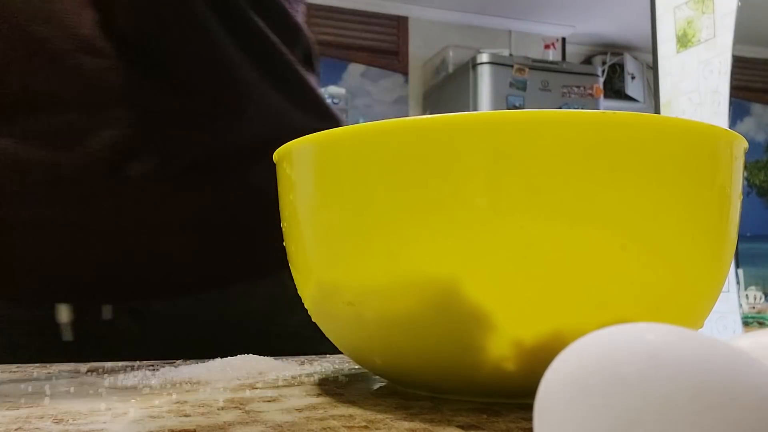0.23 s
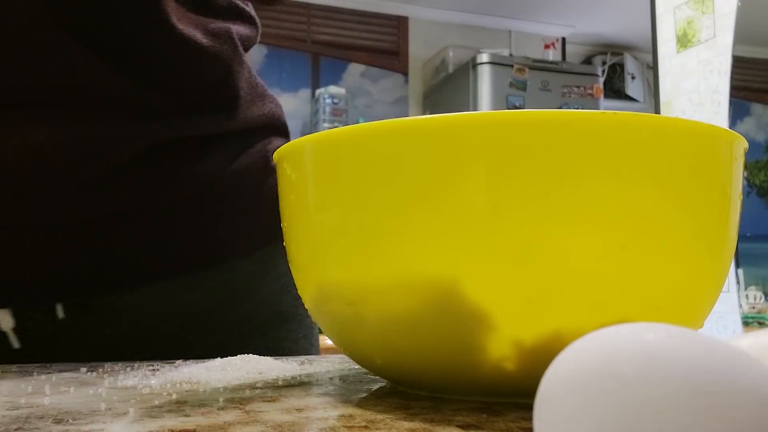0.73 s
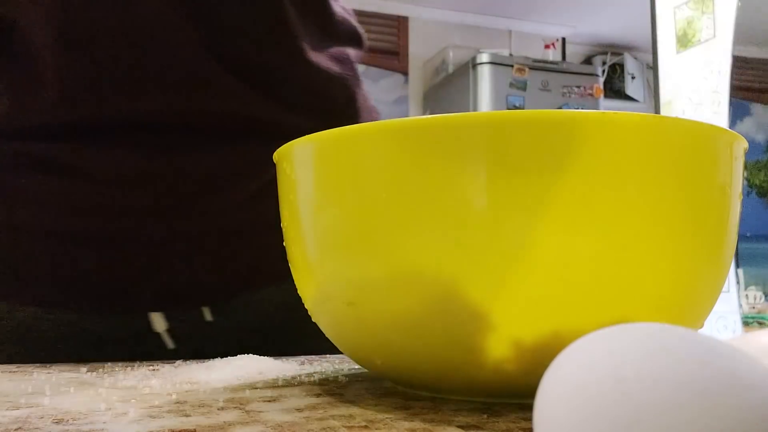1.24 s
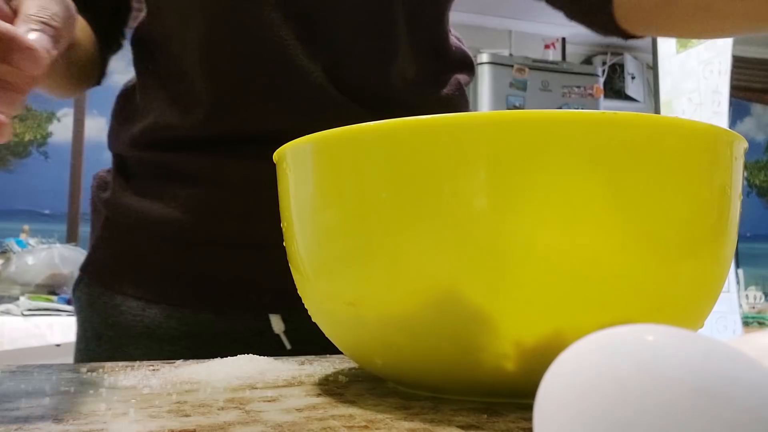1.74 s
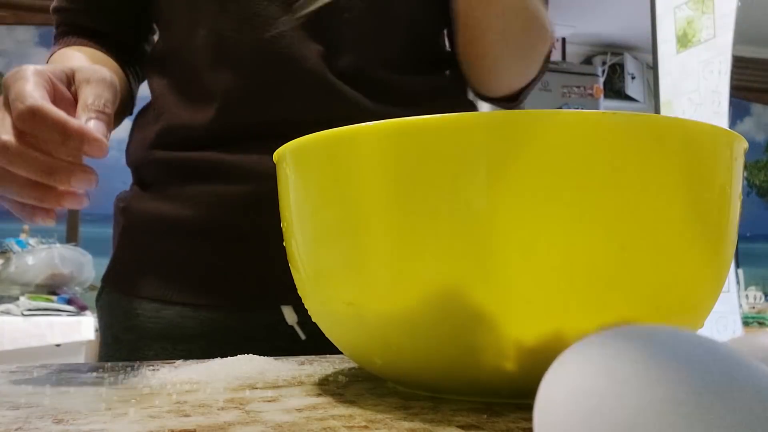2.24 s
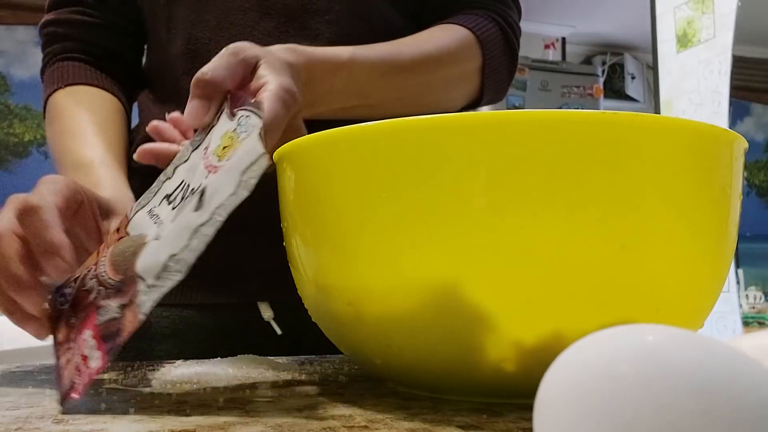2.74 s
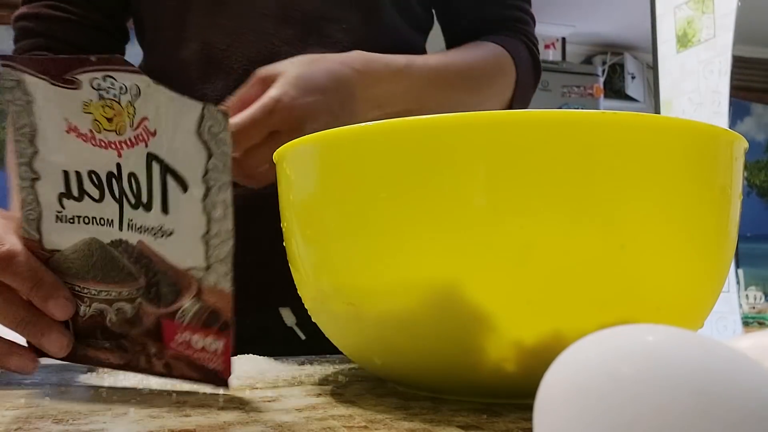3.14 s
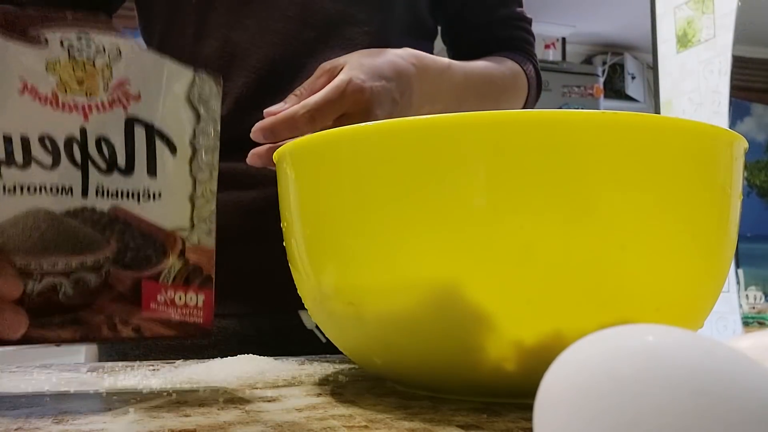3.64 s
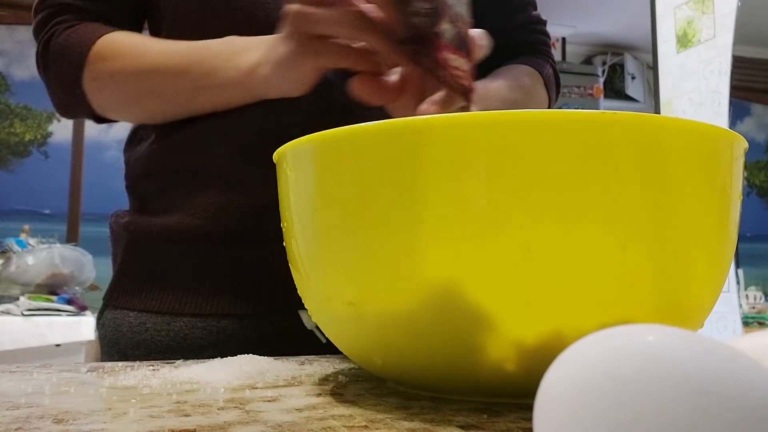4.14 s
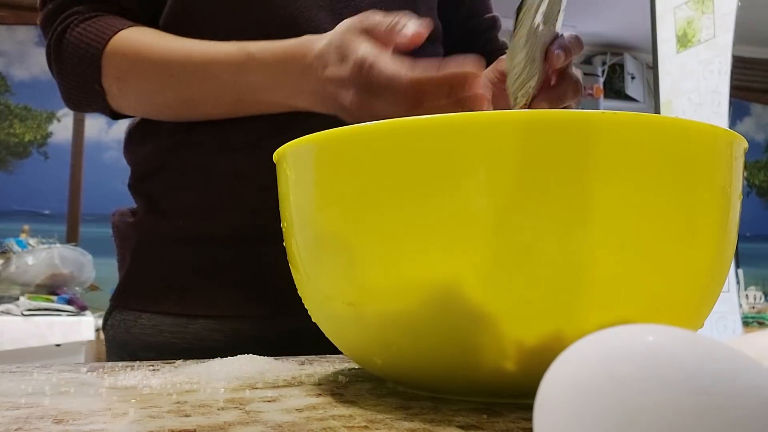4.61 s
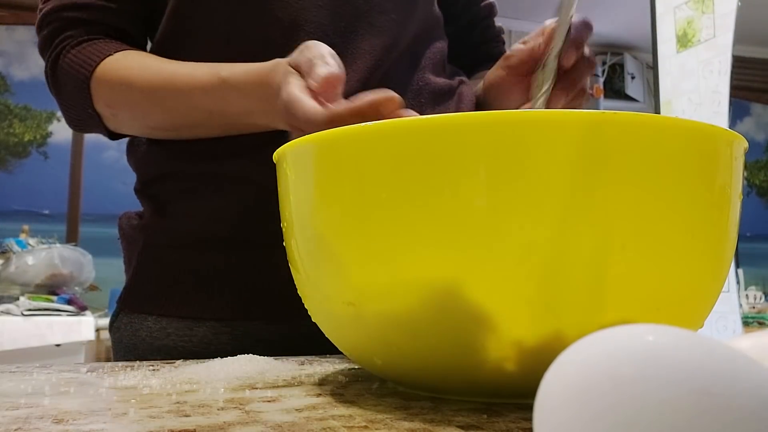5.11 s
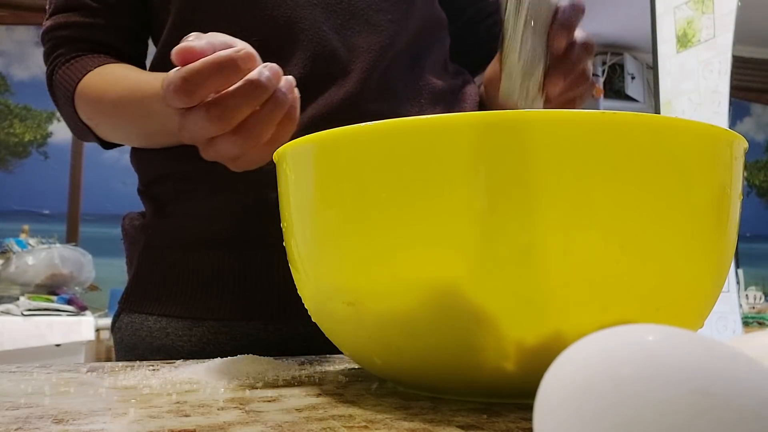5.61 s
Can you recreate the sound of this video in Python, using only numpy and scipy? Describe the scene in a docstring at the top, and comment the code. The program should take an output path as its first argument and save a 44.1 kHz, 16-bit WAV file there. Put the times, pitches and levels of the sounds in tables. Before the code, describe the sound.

Crisp foil and paper rustle close by as hands search a rattling wooden drawer, which then closes with a heavy thud. Lighter crinkles and small knocks follow as a spice sachet is picked up, with a couple of sharp snaps. It ends with a run of quiet, grainy shakes of the sachet. A fridge hums very faintly in the small kitchen.

```python
"""A fridge hums faintly in a small kitchen. Someone rummages in a drawer of packets: foil buckles, paper
scuffs, and the wood rumbles and knocks in its damped modes. Near 1.4 s the drawer is shoved shut with a
boom. A foil sachet is then handled, crinkling and snapping, and from about 3 s it is shaken over a bowl,
the spice sliding inside in short hisses. Near the end a finger slips on the foil with a faint squeak."""
import sys
import numpy as np
from scipy import signal
from scipy.fft import rfft, irfft, next_fast_len
from scipy.io import wavfile
from scipy.ndimage import uniform_filter1d, map_coordinates

SR = 44100
rng = np.random.default_rng(int(sys.argv[2]) if len(sys.argv) > 2 else 0)


def inscribe(sig):
    """Save sig as 16-bit PCM at rate SR to the path in sys.argv[1].

    A 1-D sig is mono; a 2-D sig holds one channel per row.
    Samples are clipped to [-1, 1] before scaling.
    """
    pcm = np.round(np.clip(np.atleast_2d(sig).T, -1, 1) * 32767)
    wavfile.write(sys.argv[1], SR, pcm.astype(np.int16))


N = 258426
TIME_S = np.arange(N) / SR


def amp(db):
    """Decibels as an amplitude ratio."""
    return 10 ** (np.asarray(db) / 20)

def unit_rms(x):
    """Normalisation to a mean power of 1."""
    return x / np.sqrt(np.mean(x ** 2) + 1e-20)

def in_time(rows):
    """Linear interpolation of (time_s, values...) rows, one curve per value."""
    times, *columns = np.transpose(rows)
    return [np.interp(TIME_S, times, column) for column in columns]

def at_hz(points, hz):
    """Interpolation on a logarithmic frequency axis."""
    freqs, values = np.transpose(points)
    return np.interp(np.log(hz), np.log(freqs), values)

def colour(x, spectrum):
    """Spectral shaping to unit rms; nothing passes outside the table's range."""
    size = next_fast_len(N)
    hz = np.fft.rfftfreq(size, 1 / SR) + 1
    inside = (hz > spectrum[0][0]) & (hz < spectrum[-1][0])
    return unit_rms(irfft(rfft(x, size) * amp(at_hz(spectrum, hz)) * inside, size)[:N])

def drift(rate_hz):
    """Low-passed noise: a slow random fluctuation of unit rms."""
    r = np.exp(-2 * np.pi * rate_hz / SR)
    return unit_rms(signal.lfilter([1], [1, -2 * r, r * r], rng.standard_normal(N + 9000))[9000:])

def ring(force, hz, t60_s):
    """Damped oscillator: a unit impulse starts a decaying sine of height 1."""
    r, w = amp(-60 / (t60_s * SR)), 2 * np.pi * hz / SR
    return signal.lfilter([0, np.sin(w)], [1, -2 * r * np.cos(w), r * r], force + 1e-18)

def grains(per_s, spread_db):
    """Poisson process: sparse impulses of random size and sign."""
    sizes = amp(spread_db * np.minimum(rng.exponential(1, N), 5)) * rng.choice([-1, 1], N)
    return sizes * (rng.random(N) < per_s / SR)

def steady(x, window_s):
    """Division by the running rms flattens slow swells and holds the rms near 1."""
    x = unit_rms(x)
    return x / np.sqrt(uniform_filter1d(x ** 2, size=int(window_s * SR)) + .05)

def wide_source(spectrum, per_s, spread_db, width=1.0):
    """Partial coherence of an extended source: rows of grains common to both sides, left, right."""
    common, side = [colour(grains(per_s, spread_db), spectrum) for _ in range(2)]
    return np.array([common, width * side, width * np.roll(side, N // 2)])


# Spectrum of room tone and microphone hiss: frequency_hz, density_db
AIR_SPECTRUM = [(35, -27.5), (60, -8.5), (71, -15), (179, -23), (293, -23.5), (405, -28), (445, -13.5),
                (524, -34), (960, -34.5), (1500, -36), (7290, -42.5), (12800, -25.5), (15700, -40.5)]

def room_tone():
    """Incoherent noise: each channel has a steady hiss of its own."""
    return amp(-61) * np.array([colour(rng.standard_normal(N), AIR_SPECTRUM) for _ in range(2)])

def fridge_hum(pitch_hz=48, level_db=-59):
    """Random amplitude and frequency modulation make a low tone waver, a little to the right."""
    gain = amp(level_db + drift(3))
    phase = 2 * np.pi * np.cumsum(pitch_hz + 0.4 * drift(12)) / SR
    return gain * np.sin(phase) * amp([[-1.5], [1.5]])


# Reverberation time of the kitchen: frequency_hz, t60_s
ROOM_DECAY = [(100, 0.38), (700, 0.25), (3000, 0.19), (12000, 0.17)]

def reverberation(x):
    """Diffuse field: reflections merge into noise of unit energy that decays octave by octave."""
    t, tail = np.arange(SR // 2) / SR, 0
    onset = np.clip(t / 0.00076 - .5, 0, 1)
    for low_hz in 40 * 2 ** np.arange(9.):
        band = signal.butter(2, [low_hz, min(2 * low_hz, .45 * SR)], "band", fs=SR, output="sos")
        decay = amp(-60 * t / at_hz(ROOM_DECAY, low_hz * np.sqrt(2)))
        tail = tail + signal.sosfilt(band, rng.standard_normal((2, len(t)))) * onset * decay
    tail = tail / np.sqrt(np.sum(tail ** 2, axis=1, keepdims=True))
    return signal.fftconvolve(x, tail, axes=1)[:, :N]


# Modes of the drawer and counter: frequency_hz, level_db, t60_s
WOOD_MODES = [(66, -8, .16), (113, 0, .14), (160, -3, .1), (250, -2, .09), (318, 0, .09), (385, -1, .1),
              (470, -5, .07), (620, -9, .05), (760, -9, .05), (900, -12, .05)]

def furniture():
    """Forced vibration: rolling and bumping drive the wood; three low modes boom, the rest rumble."""
    modes = [amp(db) * ring(grains(per_s=700, spread_db=4.5), hz, t60_s) * np.sqrt(.1 / t60_s)
             for hz, db, t60_s in WOOD_MODES]
    return steady(sum(modes[3:]), window_s=.03), steady(sum(modes[:3]), window_s=.05)


def finger_squeak(start_s=5.325, end_s=5.42, pitch_hz=2250, level_db=-59):
    """Friction of a finger slipping on foil: noise swells and fades through a narrow resonance."""
    slipping = (TIME_S > start_s) & (TIME_S < end_s)
    swell = np.sin(np.pi * (TIME_S - start_s) / (end_s - start_s)) ** 2 * slipping
    resonance = ring(rng.standard_normal(N), pitch_hz, t60_s=.012)
    return amp(level_db) * swell * unit_rms(ring(resonance, pitch_hz, t60_s=.012))


# Spectrum of sliding spice: frequency_hz, density_db
SPICE_SPECTRUM = [(1590, -27), (2700, -10), (4430, -1.5), (6400, -5), (11200, 3), (15700, -5)]
# Shakes of the sachet: peak_s, level_db, rise_s, fall_s
SACHET_SHAKES = [(3.062, -31.5, 0.0084, 0.011), (4.069, -47.5, 0.046, 0.021), (4.435, -44.5, 0.03, 0.022),
                 (4.69, -54.5, 0.051, 0.038), (5.019, -54, 0.064, 0.018), (5.335, -44.5, .006, 0.008),
                 (5.485, -41, 0.01, 0.0097), (5.641, -39.5, 0.017, 0.0065), (5.776, -41.5, 0.029, 0.017)]

def sliding_spice():
    """Granular noise: a hiss swells as the spice slides to one end and fades as it settles."""
    swell = sum(amp(db) * np.exp(-np.abs(TIME_S - peak_s) / np.where(TIME_S < peak_s, rise_s, fall_s))
                for peak_s, db, rise_s, fall_s in SACHET_SHAKES)
    return swell * wide_source(SPICE_SPECTRUM, per_s=17000, spread_db=2.0)


# Spectrum of scuffed paper: frequency_hz, density_db
SCUFF_SPECTRUM = [(380, -11.5), (650, -2.5), (748, -10), (1040, -6.5), (2270, -11.5), (2670, -17.5),
                  (3800, -16), (4940, -41.5), (8360, -120)]

def paper_scuff():
    """Friction noise: scuffed paper gives a stream of very uneven midrange impulses."""
    return wide_source(SCUFF_SPECTRUM, per_s=2500, spread_db=4.5)


# Spectrum of crinkling foil: frequency_hz, density_db
CRINKLE_SPECTRUM = [(1530, -23.5), (2600, -6.5), (3850, -3.5), (4180, -0.5), (4710, -2), (7300, -8),
                    (10600, -4), (12700, -3.5), (15700, -9.5)]

def foil_crinkle():
    """Buckling: each tiny fold that gives way radiates a bright click."""
    return wide_source(CRINKLE_SPECTRUM, per_s=4000, spread_db=2.5, width=1.53)


# Faint rustle between strokes: time_s, foil_db, drawer_db
RESTING_RUSTLE = [(0, -62.5, -57), (.12, -46.5, -35), (.55, -39, -45.5), (1.1, -60.5, -67),
                  (1.7, -81.5, -53.5), (2.15, -64, -69), (2.5, -80, -55.5), (2.85, -75, -57),
                  (3.25, -65.5, -68), (3.85, -90.5, -82), (4.0, -65.5, -65.5), (4.6, -63.5, -64),
                  (5.0, -70.5, -77.5), (5.86, -69, -80.5)]
# Strokes of the hands: full_s, swell_s, hold_s, foil_db, paper_db, drawer_db, counter_db
HAND_STROKES = [(0.041, 0.022, 0.049, -47.5, -54, -29, -35), (0.151, 0.066, 0.14, -35.5, -46.5, -24, -58),
                (0.276, 0.1, 0.094, -19.5, -25.5, -28.5, -41),
                (0.393, 0.038, 0.082, -31.5, -34.5, -29.5, -32),
                (0.596, 0.057, 0.058, -29, -32.5, -33.5, -38),
                (0.687, 0.037, 0.093, -32, -29.5, -27, -34.5),
                (.852, 0.0076, 0.0053, -40.5, -30.5, -38, -52), (0.9, 0.018, 0.012, -66, -41.5, -38.5, -55),
                (.955, .02, 0.027, -53, -38, -29, -46.5), (1.36, 0.054, 0.026, -9.5, -11.5, -9, -10),
                (1.397, 0.041, 0.047, -25.5, -25.5, -8.5, -13.5),
                (1.497, 0.093, 0.021, -37.5, -35.5, -26, -22),
                (1.771, 0.011, 0.019, -67.5, -61.5, -40, -49),
                (1.851, 0.049, 0.097, -44.5, -41, -34, -36.5),
                (1.983, 0.037, 0.056, -54, -55, -41.5, -58.5), (2.862, 0.021, 0.017, -52.5, -56, -43, -51),
                (2.917, 0.018, 0.02, -75, -64, -40.5, -53), (3.015, 0.081, 0.086, -33, -45, -49, -57),
                (3.122, .03, 0.0087, -66, -44, -34.5, -42), (3.959, 0.041, 0.1, -51.5, -73, -60.5, -67.5),
                (4.17, 0.018, 0.018, -67.5, -77, -54, -55.5), (4.608, 0.038, 0.047, -60, -71, -60.5, -83),
                (5.17, 0.0045, .03, -55, -51.5, -54, -77), (5.32, 0.018, 0.018, -59.5, -75.5, -73, -44.5)]

def handling(swell_db=30):
    """Incoherent addition: strokes sum in power, giving gains for foil, paper, drawer and counter."""
    release_db_per_s = [464.7, 405, 333, 220]   # in that same order
    foil_db, drawer_db = in_time(RESTING_RUSTLE)
    power = amp([foil_db, foil_db - 12, drawer_db, drawer_db - 8]) ** 2
    for full_s, swell_s, hold_s, *levels_db in HAND_STROKES:
        near = slice(max(int((full_s - 2 * swell_s) * SR), 0), int((full_s + hold_s + .3) * SR))
        early_s = np.maximum(full_s - TIME_S[near], 0)
        late_s = np.maximum(TIME_S[near] - full_s - hold_s, 0)
        stroke_db = np.c_[levels_db] - swell_db * early_s / swell_s - np.outer(release_db_per_s, late_s)
        power[:, near] += amp(stroke_db) ** 2
    return np.sqrt(power)


# Foil snaps paired with wood knocks, at relative levels:
# start_s, snap_db, treble_db, knock_db, snap_centre_hz, knock_centre_hz
IMPACTS = [(0.04, -52, -53, -21, 1000, 277), (.056, -49, -49, -9.5, 1000, 395),
           (0.26, -13.5, -18, -5, 1520, 190), (.355, -5.5, -23, -7.5, 2820, 252),
           (0.438, -9, -33, -21.5, 4640, 280), (0.59, -9.5, -33, -17.5, 1260, 136),
           (0.702, -8.5, -12, -25, 4200, 312), (0.727, 2.5, -9.5, -13, 1270, 113),
           (.783, -11.5, -29, -16.5, 3570, 308), (0.848, -28, -28, -23, 1350, 340),
           (.86, -38, -23, -49.5, 3000, 300), (0.867, -33, -56, -17, 1460, 408),
           (.901, -21, -19, -59, 1450, 307), (0.95, -49, -76, -13, 1440, 350),
           (.983, -39, -35, -30, 1310, 365.2), (1.026, -23, -55, -9.5, 1290, 900),
           (1.086, -12, -7.5, -6, 3580, 875), (1.28, -22.5, -52, -58, 1920, 377),
           (1.309, -13.5, -23, -15, 1970, 370), (1.651, -40, -73.5, -38, 1590, 59),
           (1.769, -52, -45.5, -25.5, 2300, 114), (1.829, -30.5, -44, -33, 1580, 296),
           (1.854, -19.5, -55, -15, 1920, 147), (1.985, -23, -38, -36, 2720, 115),
           (2.03, -23.5, -60, -24, 950, 105), (2.086, -7.5, -24.5, -9.5, 1330, 185),
           (2.26, -53, -60.5, -31, 2330, 134), (2.347, -41, -72.5, -32.5, 1002, 121),
           (2.415, -58, -77, -44, 996, 300), (2.447, -35, -52, -25.5, 1105, 496),
           (2.488, -44, -71.5, -34, 1150, 132), (2.51, -54, -74, -30.5, 1000, 403),
           (2.551, -62, -47.5, -30.5, 1590, 120), (2.588, -59, -75.5, -40, 980, 408),
           (2.634, -30, -43.5, -28, 2210, 306), (2.693, -46.5, -70, -33, 1634, 119.6),
           (2.758, -58, -76, -28, 1780, 73.6), (2.799, -40, -50, -38, 1820, 114.5),
           (2.853, -47, -46, -32, 2360, 111), (2.894, -29.5, -30.5, -49, 2550, 70),
           (2.916, -30.5, -59, -24.5, 1480, 102), (3.103, -6, -22, -2, 969, 864),
           (3.141, -15, -34, -25.5, 2380, 87), (3.348, -44, -42, -60, 1483, 62),
           (3.953, -29.5, -33, -25, 2210, 73), (3.965, -9, -10.5, -24, 2050, 314),
           (4.156, -37.5, -41, -28, 2070, 67.6), (4.599, -44, -48, -36, 2700, 432),
           (5.171, -28.5, -43, -39, 2900, 404), (5.321, -47, -50.5, -30, 4400, 87.8)]

def wood_knocks(db_per_octave=12):
    """Impulse response: a push rings the wood modes, most strongly near its centre frequency."""
    start_s, _, _, knock_db, _, centre_hz = np.transpose(IMPACTS)
    starts, knocks = (start_s * SR).astype(int), np.zeros(N)
    for hz, db, t60_s in WOOD_MODES:
        mode_db = knock_db + db - 3.5 - db_per_octave * np.abs(np.log2(hz / centre_hz))
        pushes = np.zeros(N)
        pushes[starts] = amp(mode_db + rng.normal(0, 1.5, len(starts))) * rng.choice([-1, 1], len(starts))
        knocks += ring(pushes, hz, 0.8 * t60_s)
    return np.convolve(knocks, np.hanning(41) / 20)[:N]   # a soft contact removes the treble


# Broad, quickly damped modes of the stiff foil: frequency_hz, level_db
FOIL_MODES = [(900, -4.5), (1300, -9), (2000, 0.5), (2700, -1), (3400, -0.5), (4300, 1.5), (5600, 2.5),
              (7200, -0.5), (8800, -5.5), (10500, -2), (12300, 3), (14200, -7)]

def foil_snaps(crumble_s=.0035, t60_cycles=8, treble_above_hz=4500, db_per_octave=8):
    """Snap-through buckling: at each impact a sharp crack and a burst of crumbling ring the foil."""
    start_s, snap_db, treble_db, _, centre_hz, _ = np.transpose(IMPACTS)
    starts, snaps = (start_s * SR).astype(int), np.zeros(N)
    t = np.arange(1500) / SR
    crumble = 0.69 * np.minimum(t / .0006, 1) * np.exp(-t / crumble_s)
    for hz, db in FOIL_MODES:
        octaves_away = np.abs(np.log2(hz / centre_hz))
        mode_db = treble_db if hz > treble_above_hz else snap_db - db_per_octave * octaves_away
        force = np.zeros(N + len(t))
        for i, level in zip(starts, amp(mode_db + db + rng.normal(0, 1.5, len(starts)))):
            force[i:i + len(t)] += level * rng.standard_normal(len(t)) * crumble * np.sqrt(hz / 34000)
            force[i + 30] += 1.2 * level * rng.choice([-1, 1])   # the first, sharp buckle
        motion = ring(force[:N], hz, t60_cycles / hz)
        snaps += np.gradient(motion) / np.sin(2 * np.pi * hz / SR)   # a thin sheet radiates no bass
    return snaps


# Direction of the hands as a level difference: time_s, left_minus_right_db
HAND_PAN = [(0, 1.5), (.78, 3.5), (1.26, -4), (2.5, -3.5), (2.75, -5), (3.04, 1), (3.8, 1.5), (4.9, -3.5),
            (5.86, -1.5)]
# Direction of the hands as an arrival-time difference: time_s, left_delay_ms
HAND_LAG = [(0, -.38), (1.04, -.38), (1.07, .45), (2.2, .45), (2.25, -.12), (3.5, -.12), (3.9, .1),
            (5.86, .15)]

def at_hands(mono, incoherent=0, pan_scale=1, pan_offset_db=0):
    """Stereo localisation: direction sets a delay and a level step between two microphone ports."""
    (hand_db,), (lag_ms,) = in_time(HAND_PAN), in_time(HAND_LAG)
    pan_db = pan_scale * hand_db + pan_offset_db
    half_lag = lag_ms * SR / 2000
    ports = np.array([map_coordinates(mono, [np.arange(N) - side * half_lag], order=3, mode="nearest")
                      for side in (1, -1)])
    return (ports + incoherent) * amp(np.array([pan_db, -pan_db]) / 2)


def scene():
    """Superposition: the direct sound of packets and wood, its reverberation, and the background."""
    foil_gain, paper_gain, drawer_gain, counter_gain = handling()
    clumps = amp(3.0 * drift(50))   # buckles come in clumps
    rustle = clumps * (foil_gain * foil_crinkle() + paper_gain * paper_scuff())
    common, *sides = rustle + sliding_spice()
    rumble, boom = furniture()
    snaps = at_hands(foil_snaps())
    vibration = drawer_gain * rumble + counter_gain * boom + wood_knocks()
    wood = at_hands(vibration, pan_scale=1.1, pan_offset_db=-4.5)
    packets = at_hands(common + finger_squeak(), incoherent=np.array(sides))
    reflections = reverberation(amp(-4.5) * packets + amp(-8.5) * snaps + amp(-13) * wood)
    return packets + snaps + wood + reflections + room_tone() + fridge_hum()

def record(dry, threshold_db=-13, release_db_per_s=53, smoothing_s=0.034):
    """Compression: the gain ducks when loud and creeps back; peaks clip; deep bass and the top are cut."""
    dry = signal.sosfilt(signal.butter(4, 40, "high", fs=SR, output="sos"), dry)
    level_db = 20 * np.log10(uniform_filter1d(np.abs(dry).max(axis=0), size=441) + 1e-6)
    release_db = release_db_per_s * TIME_S
    held_db = np.maximum.accumulate(level_db + release_db) - release_db
    over_db = np.maximum(held_db - threshold_db, 0)
    r = np.exp(-1 / (smoothing_s * SR))
    ducked = dry * amp(-.45 * signal.lfilter([1 - r], [1, -r], over_db))
    lowpass = signal.cheby2(16, 50, 16000, fs=SR, output="sos")
    return signal.sosfilt(lowpass, np.clip(ducked, -.97, .97))


dry = scene()
out = record(dry)
inscribe(out)
```